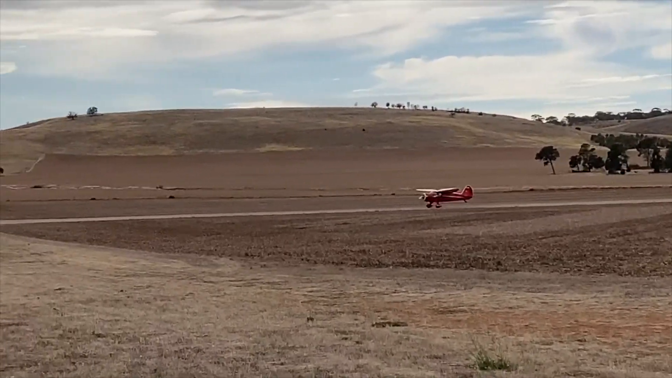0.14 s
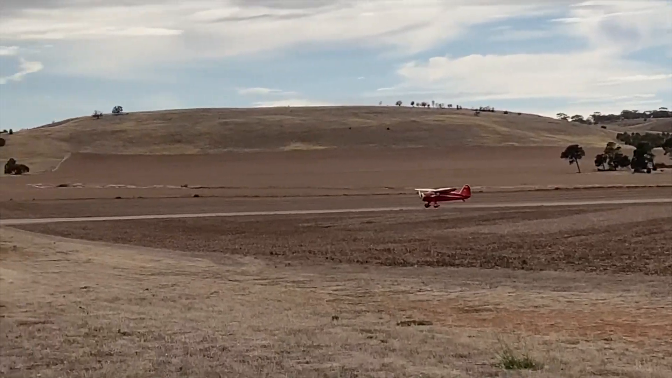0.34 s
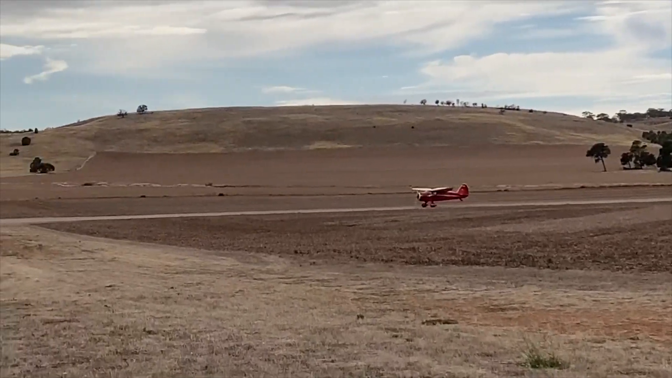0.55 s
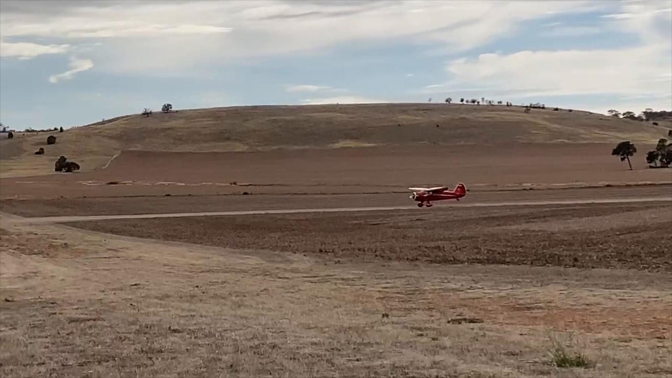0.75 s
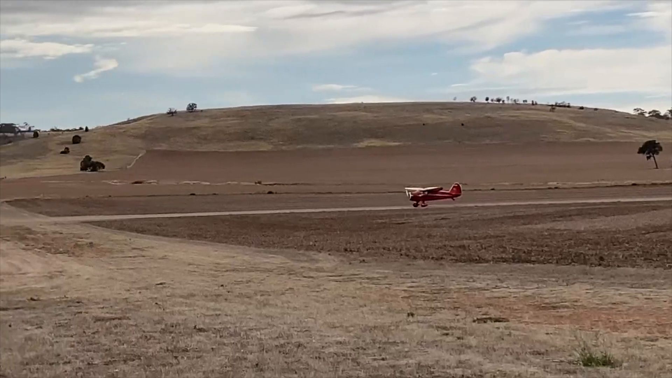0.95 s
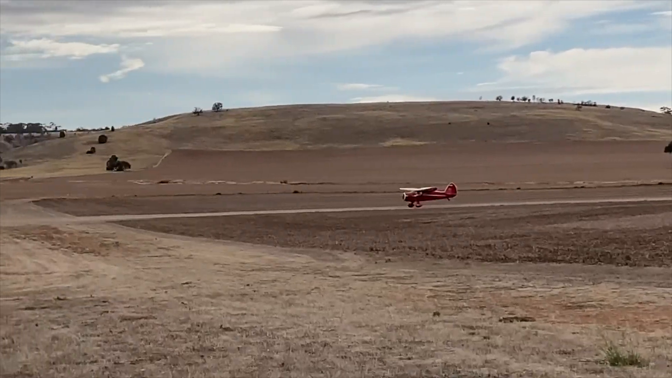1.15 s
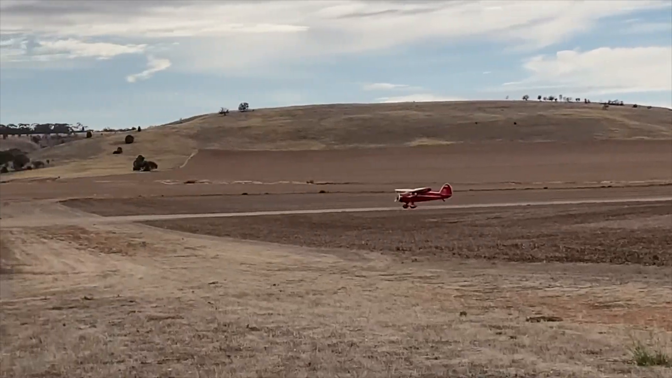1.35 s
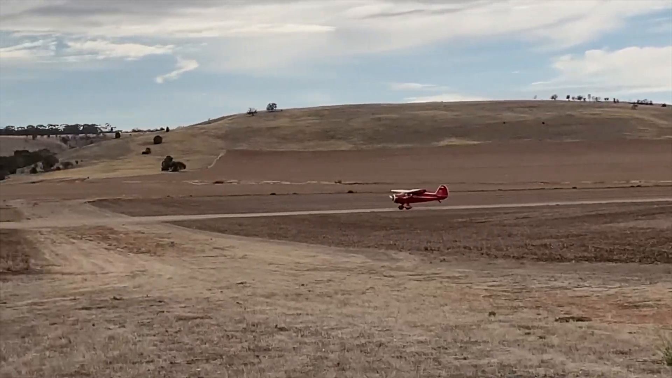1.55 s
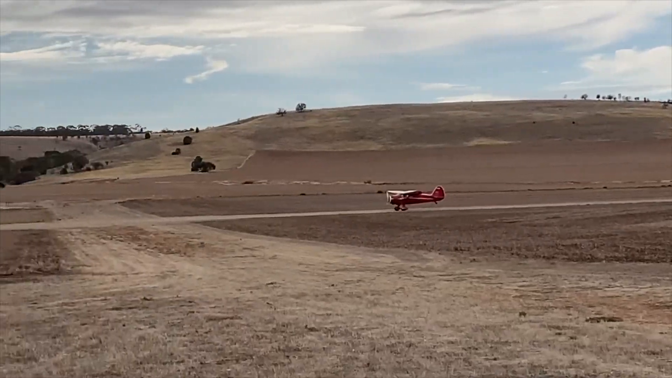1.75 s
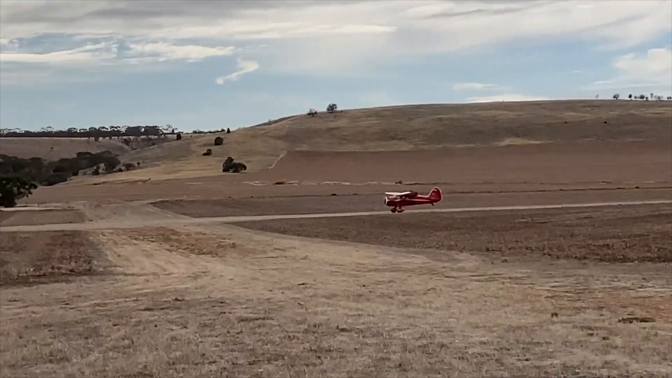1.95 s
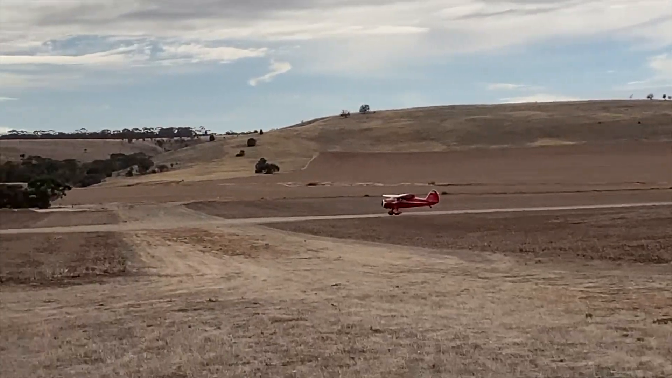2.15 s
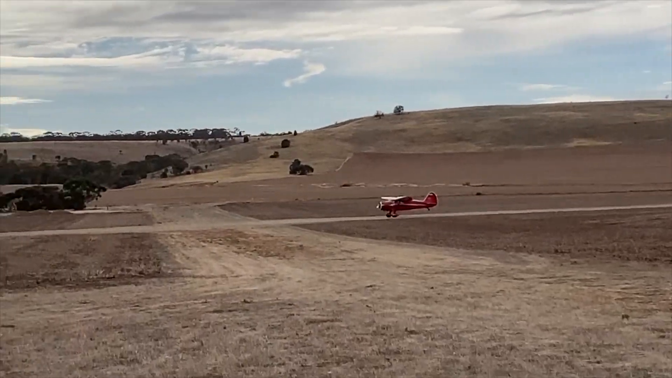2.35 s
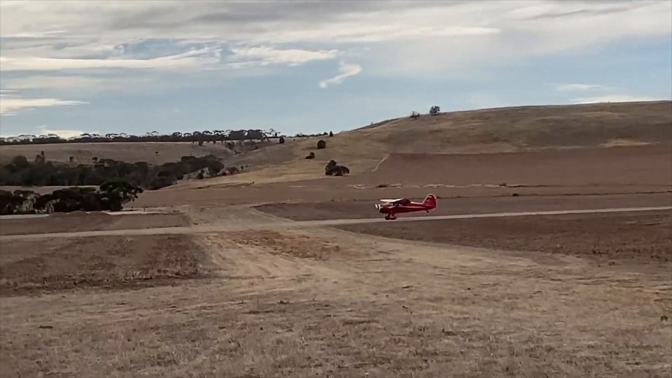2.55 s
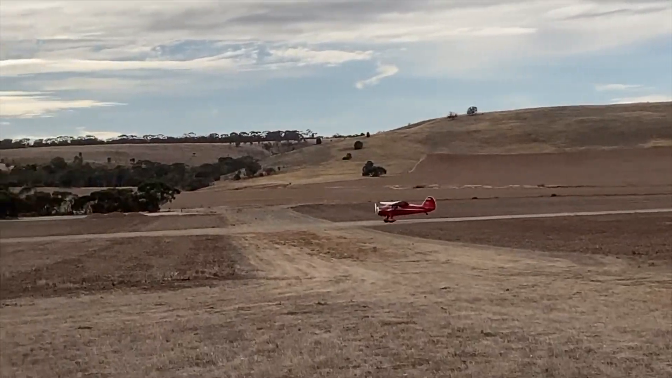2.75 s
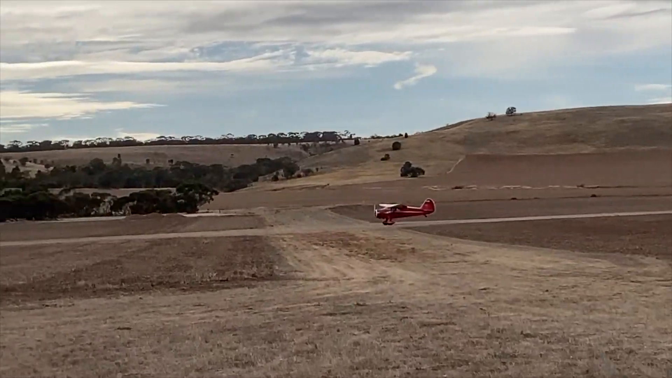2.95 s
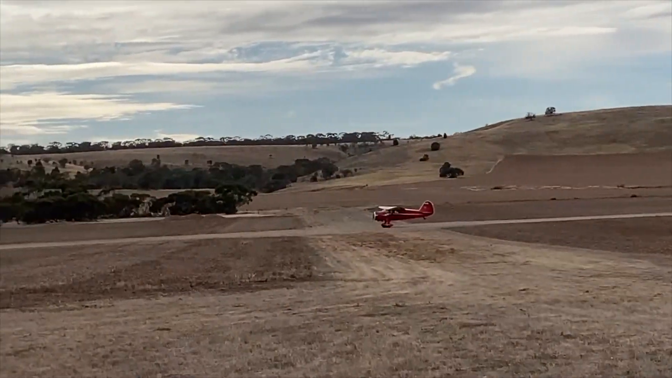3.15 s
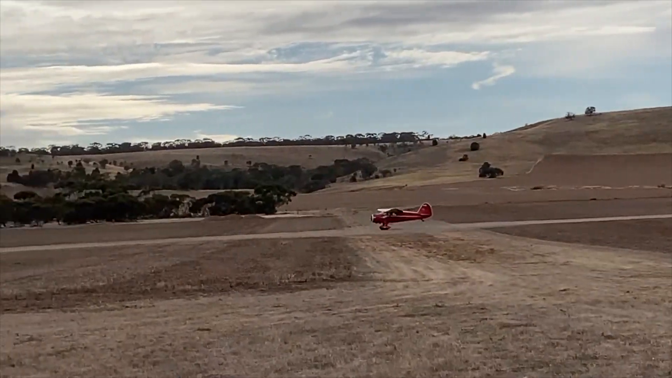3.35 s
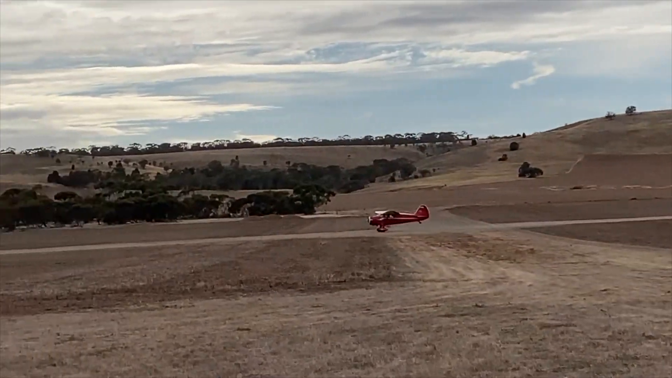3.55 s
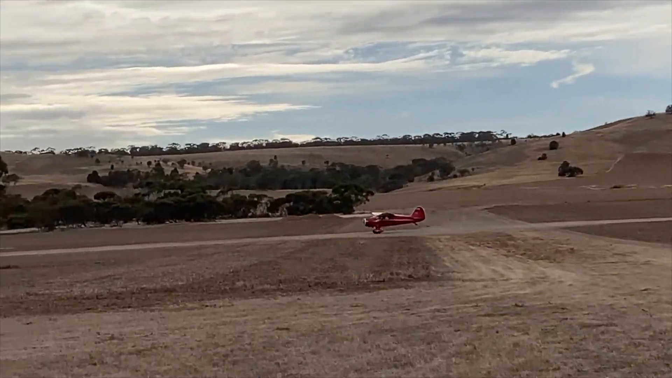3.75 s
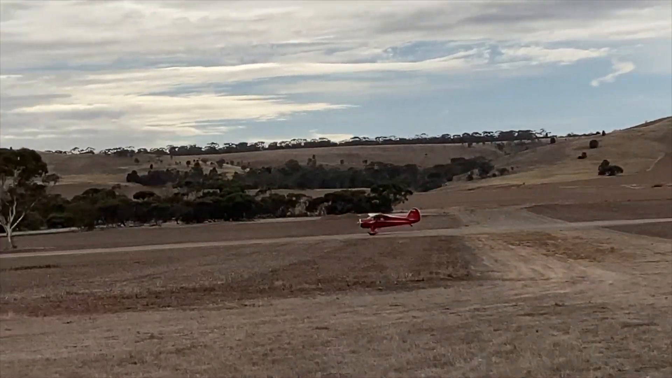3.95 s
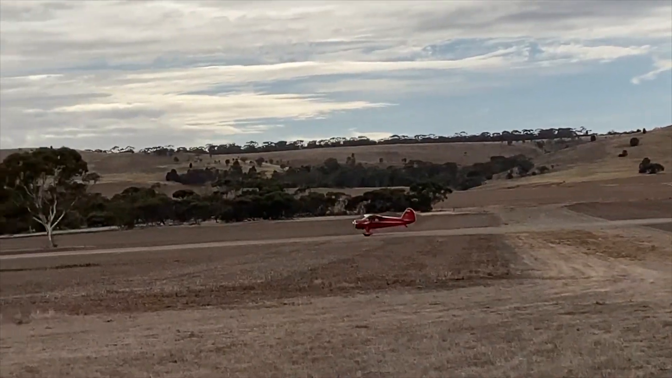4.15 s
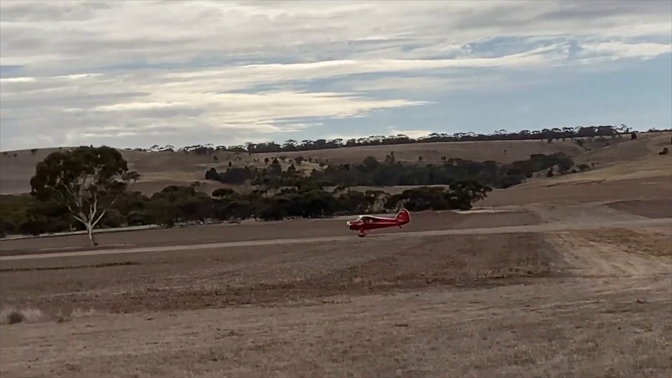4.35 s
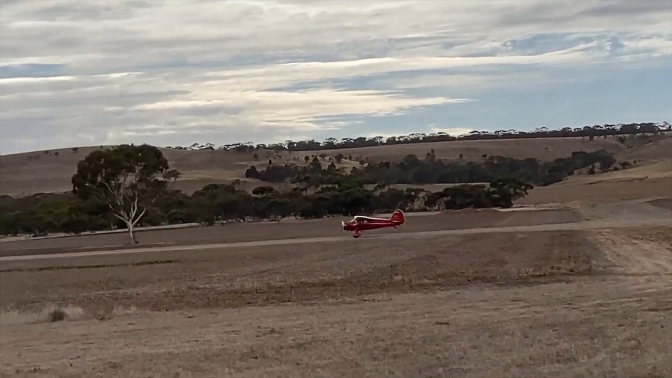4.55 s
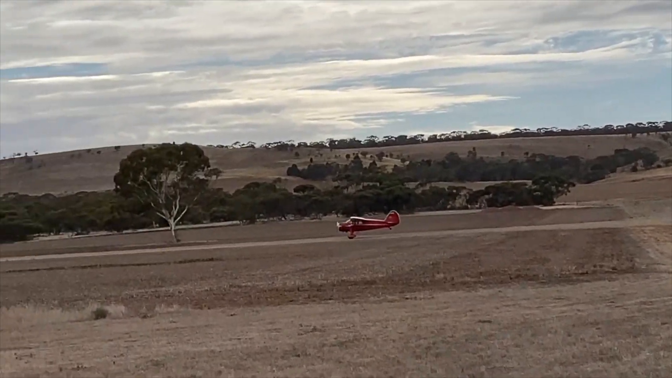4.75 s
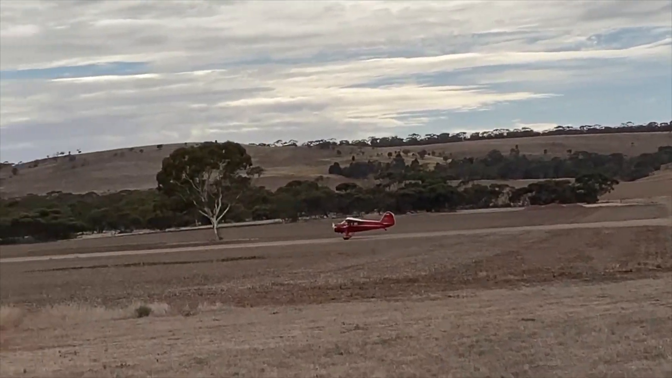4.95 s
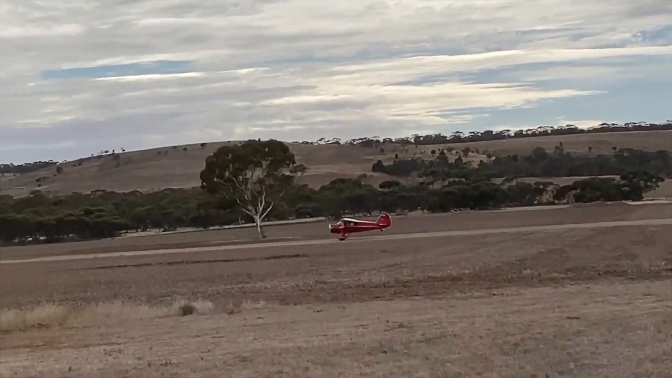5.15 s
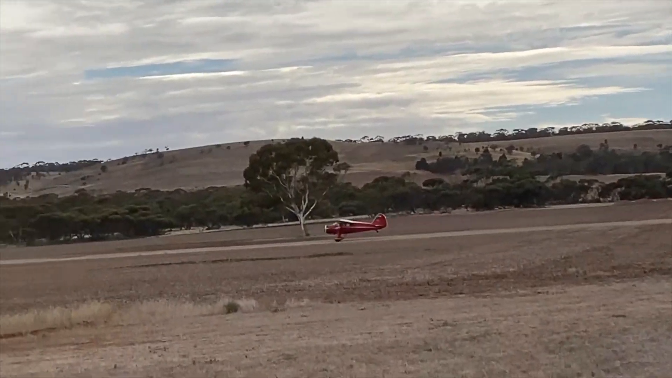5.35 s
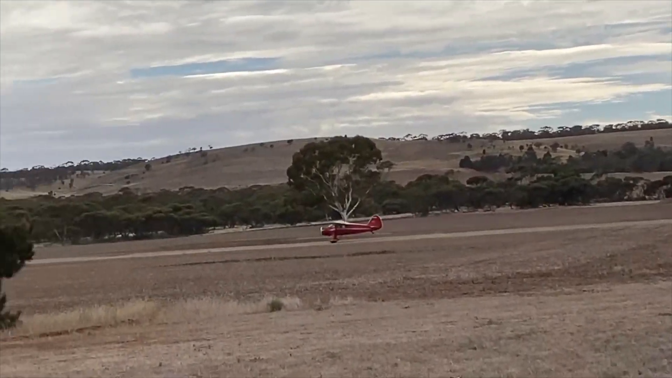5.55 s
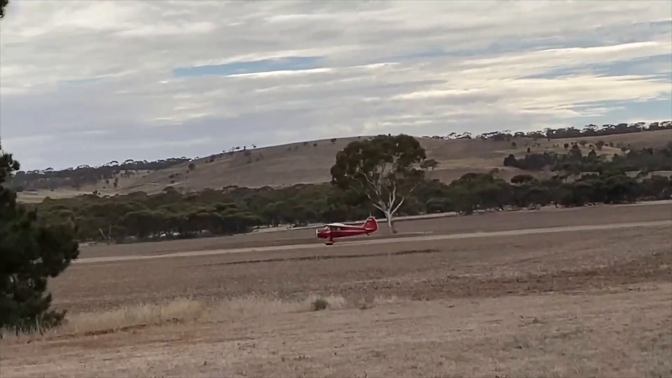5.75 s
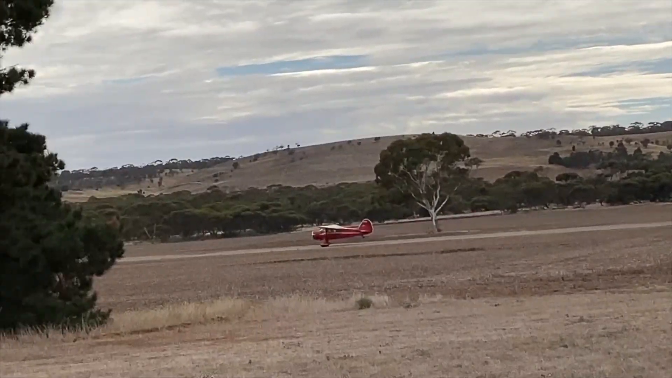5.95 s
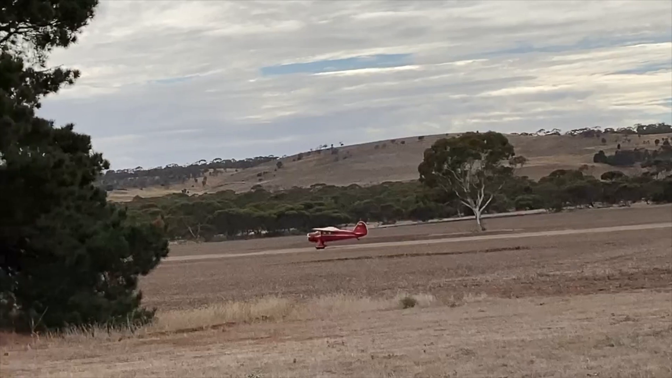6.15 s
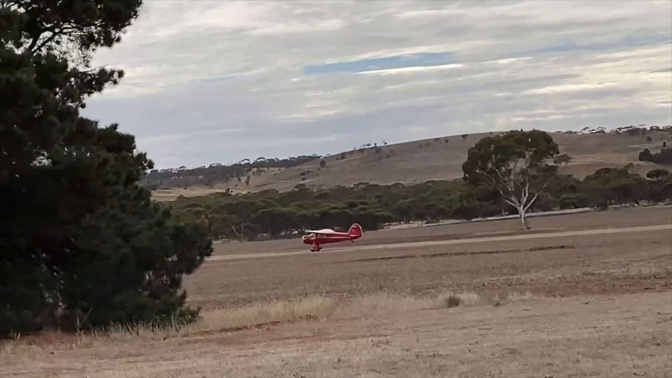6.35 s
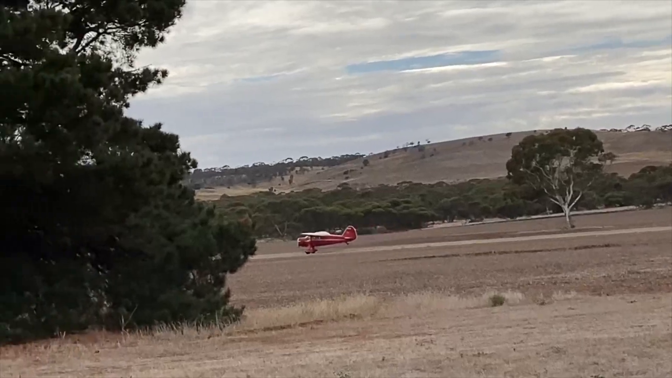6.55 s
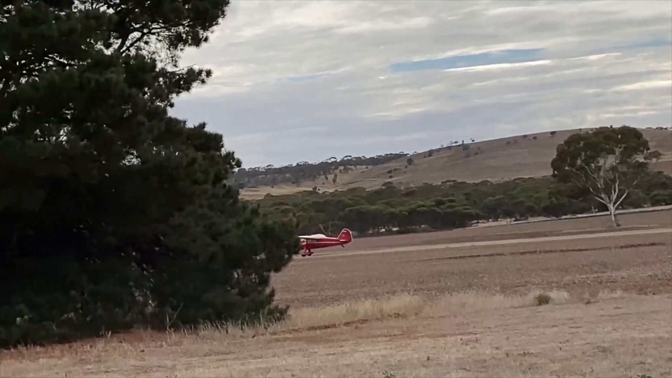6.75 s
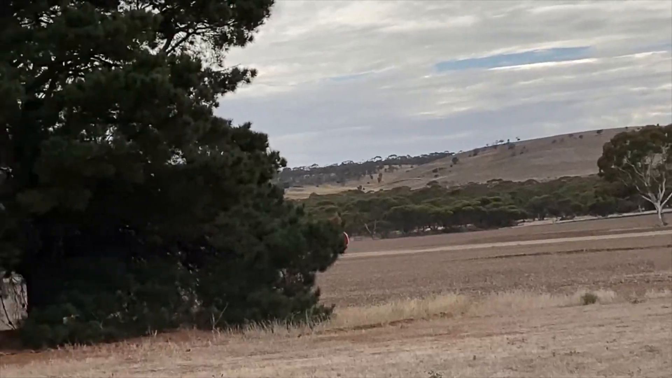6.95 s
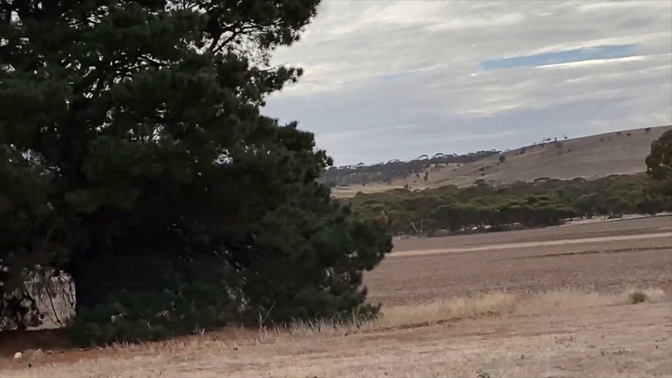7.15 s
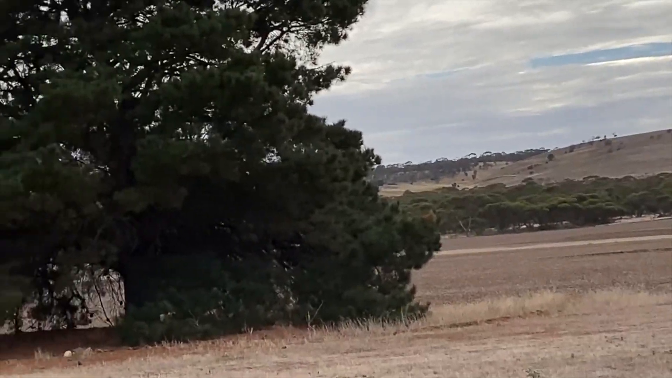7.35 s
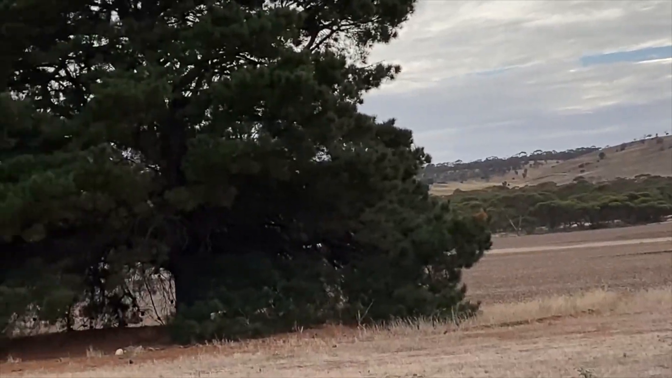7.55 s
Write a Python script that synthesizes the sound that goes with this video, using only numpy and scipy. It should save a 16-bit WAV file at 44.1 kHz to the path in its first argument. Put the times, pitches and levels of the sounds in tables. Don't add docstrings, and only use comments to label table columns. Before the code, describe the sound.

A vintage light aircraft rolls past across open dry fields. Low rumble of slipstream, wheels and a gust of breeze comes first with a soft blade hum; the hum swells and turns buzzy abeam, then uneven exhaust pops and hiss crackle over the drone as the engine slows very slightly. Outdoor handheld stereo microphone at a distance, turning to follow, little echo.

```python
import sys
import numpy as np
from scipy import signal
from scipy.fft import rfft, irfft, next_fast_len
from scipy.io import wavfile

SR = 44100
rng = np.random.default_rng(int(sys.argv[2]) if len(sys.argv) > 2 else 0)


def voltage_ratio(decibels):
    exponent = np.asarray(decibels, float) / 20
    return 10 ** exponent


def unload_audio(sound):
    columns = np.transpose(np.atleast_2d(sound))
    steps = np.round(np.clip(columns, -1, 1) * 32767)
    wavfile.write(sys.argv[1], SR, steps.astype(np.int16))


N = 335593
ABEAM_S, ABEAM_HALF_S = 3.79, 0.72


def in_time(rows):
    s, *columns = np.transpose(rows)
    return [np.interp(np.arange(N) / SR, s, c) for c in columns]


def at_hz(points, hz):
    table_hz, value = np.transpose(points)
    return np.interp(np.log(hz), np.log(table_hz), value)


def at_fft(points, size):
    return at_hz(points, np.maximum(np.arange(size // 2 + 1) * SR / size, 1))


def rms_one(x):
    return x / np.sqrt(np.mean(x ** 2) + 1e-20)


def bell(centre_s, half_s, squareness=2):
    return np.exp(-np.abs((np.arange(N) / SR - centre_s) / half_s) ** squareness)


def drift(rate_hz):
    r = np.exp(-80 * np.pi * rate_hz / SR)
    white = rng.standard_normal(N // 40 + 2002)
    slow = signal.lfilter([1], [1, -2 * r, r * r], white)[2000:]
    return np.interp(np.arange(N) / 40, np.arange(len(slow)), rms_one(slow))


def partial(multiple, cycles, level_db, shimmer_db, wander_rad, offset_rad=0):
    gain = np.sqrt(2) * voltage_ratio(level_db + shimmer_db * drift(5.8))
    return gain * np.cos(2 * np.pi * multiple * cycles + offset_rad + wander_rad * drift(3.8))


# f/Hz, likeness [0-1]
LIKENESS = [(60, .85), (220, .7), (480, .85), (900, .85), (2200, .9), (2900, .65), (4000, .87), (5200, .72),
            (6000, .4), (6800, .9), (9000, .9)]


def bands(low_hz, high_hz, count, spectrum, envelope):
    out, edges = 0, np.geomspace(low_hz, high_hz, count + 1)
    white = rng.standard_normal((2, 2, N))
    for k, (low, high) in enumerate(zip(edges, edges[1:])):
        band = signal.butter(2, [low, high], "band", fs=SR, output="sos")
        mid, side = signal.sosfilt(band, white[k % 2])
        hz = np.sqrt(low * high)
        alike = np.clip(at_hz(LIKENESS, hz), 0, 1)
        pair = np.sqrt(1 + alike) * mid + np.sqrt(1 - alike) * side * [[1], [-1]]
        out = out + envelope(hz) * pair
    size = next_fast_len(N)
    return rms_one(irfft(rfft(out, size) * voltage_ratio(at_fft(spectrum, size)), size)[:, :N])


# f/Hz, density/dB per Hz
RUMBLE_COLOUR = [(20, -25.5), (35, -6), (60, -1), (110, -3.5), (200, -2), (280, -18), (450, -22),
                 (800, -25.5), (1200, -27.5)]


def rumble(null_db, buzz_db):
    breeze_db = 4 * bell(.7, 0.58)
    tips_db = 0.4 * (buzz_db - buzz_db.mean())

    def envelope(hz):
        swell_db = tips_db if hz > 300 else breeze_db if hz > 170 else 0
        return voltage_ratio(2.0 * drift(2.5) + swell_db)
    level_db = -42.5 - .3 * null_db
    return voltage_ratio(level_db) * bands(22, 1088, count=10, spectrum=RUMBLE_COLOUR, envelope=envelope)


# t/s, level/dB
HISS = [
    (0, -59),
    (1.6, -60.5),
    (2.6, -56),
    (5.3, -58.5),
    (6.3, -54.5),
    (7.0, -56),
    (7.5, -59.5),
]
# t/s, half length/s, lift/dB, centre f/Hz
POCKETS = [(.3, 0.27, 2.5, 4500), (1.918, 0.092, -4, 900), (2.389, 0.069, 4, 2000), (2.46, 0.041, 3, 900),
           (2.832, 0.037, 2.5, 1200), (2.99, 0.062, 4, 1900), (3.219, 0.11, 7.5, 1107),
           (3.251, 0.17, 8, 4860), (3.781, .06, 4.5, 1100), (3.99, 0.085, 5.5, 1300),
           (4.736, 0.065, 2.5, 2800), (4.901, 0.046, 5.5, 1800), (5.13, .1, 4.5, 3200),
           (5.463, 0.063, 4.5, 2500), (5.653, .06, 6.5, 1300), (5.582, 0.12, 3.5, 3810),
           (6.504, 0.53, -2.5, 5010), (7.038, .08, 3, 2800), (7.4, .25, -3.5, 5960)]


def hiss_swell(hz):
    follows = 0.63 if hz < 1500 else 0.49 if hz > 2650 else 1
    s, half_s, lift_db, centre_hz = np.transpose(POCKETS)
    t = np.arange(0, N + 128, 128) / SR
    level_db = np.interp(t, *np.transpose(HISS))
    near_db = lift_db * np.exp(-(np.log2(hz / centre_hz) / 0.81) ** 2)
    pockets_db = np.exp(-((t[:, None] - s) / half_s) ** 2) @ near_db
    return np.interp(np.arange(N) / SR, t, follows * (level_db - level_db.mean()) + pockets_db)


# place in cycle [0-1], bark level/dB, sizzle level/dB
CYLINDERS = [
    (0.058, 2.4, 4),
    (.28, -3.5, 1),
    (.53, -14, -5),
    (.64, -1, -0.5),
    (0.789, -6.5, -4.5),
]
# f/Hz, density/dB per Hz
HISS_COLOUR = [(600, -5), (900, -9), (1200, -1.5), (1470, -6), (1620, -1), (2200, 0.5), (2570, -9),
               (2750, -7.5), (3050, -12.5), (3400, -10.5), (4500, -12), (6000, -19.5), (7000, -19.5),
               (9000, -31), (10500, -45.5)]


def exhaust_hiss(cycles):
    place, bark_db, sizzle_db = np.transpose(CYLINDERS)
    count = int(cycles[-1]) + 2
    firings = (np.arange(-1, count)[:, None] + np.sort(place)).ravel()
    last = np.searchsorted(firings, cycles) - 1
    since = cycles - firings[last]
    spit = (1 - np.exp(-since / .034)) * np.exp(-since / .11)
    common = rng.standard_normal(len(firings))

    def envelope(hz):
        high = hz > 2650
        cylinder_db = np.tile(sizzle_db if high else bark_db, count + 1)
        own = np.clip(rng.standard_normal(len(firings)), -3, 1.7)
        force = voltage_ratio(cylinder_db + 1.1 * common + (2.3 if high else 3.6) * own)
        return voltage_ratio(hiss_swell(hz) + 2.05 * drift(8)) * (0.32 + force[last] * spit)
    return voltage_ratio(-53) * bands(646, 10860, count=16, spectrum=HISS_COLOUR, envelope=envelope)


# t/s, peak level/dB, pipe ring f/Hz
POPS = [(2.9843, -37.5, 1870), (3.1433, -45.5, 2070), (3.7813, -38, 2175), (4.0495, -38.5, 1664),
        (4.2602, -33.5, 2160), (4.742, -37, 2290), (4.9023, -34, 2150), (5.116, -41, 1850),
        (5.1683, -41, 1650), (5.224, -39.5, 1900), (5.3827, -42, 1910), (5.436, -31.5, 2120),
        (5.489, -37.5, 1825), (5.627, -35.5, 1670), (5.6521, -40.5, 1576), (5.7044, -40, 1375),
        (5.7355, -39, 1810), (5.9733, -36, 2085), (6.2432, -36.5, 1997), (6.6202, -35, 1820),
        (6.6764, -37.5, 2044), (6.7286, -39, 1930), (6.8376, -42, 1700), (6.923, -38.5, 2290),
        (7.0556, -36.5, 1784), (7.1077, -36, 2030), (7.1648, -41, 1250), (7.3262, -38.5, 2310),
        (7.5433, -47, 1260), (7.5752, -35, 1790)]


def pops():
    out, t = np.zeros(N), np.arange(round(.025 * SR)) / SR
    for s, peak_db, ring_hz in POPS:
        jitter_rad = np.cumsum(rng.normal(0, 0.065, len(t)))
        ring = np.sin(2 * np.pi * ring_hz * t + jitter_rad) * np.exp(-t / 0.0044)
        crack = rng.standard_normal(len(t)) * np.exp(-t / .002) * voltage_ratio(-26.0)
        pop = (ring + crack) * (1 - np.exp(-t / 0.002)) ** 2 * voltage_ratio(peak_db + 4.5)
        at = round((s - .002) * SR)
        out[at:at + len(t)] += pop[:N - at]
    return signal.sosfilt(signal.butter(4, [900, 6500], "band", fs=SR, output="sos"), out)


# t/s, level/dB
EXHAUST = [(0, -34.5), (.9, -35.5), (1.5, -30.5), (2.2, -28.5), (2.85, -33.5), (3.4, -26.5), (3.92, -34),
           (4.2, -29.5), (5.2, -31.5), (6.9, -33), (7.2, -31), (7.61, -36)]
# multiple of engine cycle, level/dB
UNEVEN = [(2, -19.5), (3, -5), (6, -3.5), (7, -2), (9, -7.5), (10, -10.5), (11, -10.5), (13, -20.5)]


def exhaust_tones(cycles, blade_db):
    fired = cycles - .035
    firing_db = in_time(EXHAUST)[0]
    abeam_db = 4.5 * bell(ABEAM_S, ABEAM_HALF_S)
    uneven_db = -9.5 - 3 - np.arange(N) / SR + abeam_db + 0.89 * blade_db
    tones = partial(5, fired, firing_db, 0.58, 0.12)
    for multiple, level_db in UNEVEN:
        follows_db = firing_db - 11.0 if multiple < 6.5 else uneven_db
        tones += partial(multiple, fired, follows_db + level_db, 0.58, 0.54)
    return tones


# multiple of engine cycle, level under buzz/dB
BLADE_MISMATCH = [(14, -14), (15, -26.5), (18, -24), (22, -25.5), (26, -25.5), (30, -29.5)]


def mismatch(cycles, buzz_db):
    behind_s = np.maximum(np.arange(N) / SR - ABEAM_S - ABEAM_HALF_S, 0)
    level_db = buzz_db - 4 * behind_s
    return sum(partial(multiple, cycles, level_db + under_db, 1.5, 0.54) for multiple, under_db in BLADE_MISMATCH)


# t/s, blade rate f/Hz
SPEED = [(0.0, 74.77), (0.8, 75.0), (1.2, 75.18), (1.6, 75.3), (2.4, 75.46), (2.8, 75.26), (3.2, 75.35),
         (3.6, 75.29), (4.0, 74.92), (4.4, 75.07), (4.8, 74.83), (5.2, 74.72), (6.0, 74.37), (7.61, 73.32)]


def engine_cycles():
    return np.cumsum(in_time(SPEED)[0] / 4) / SR


# t/s, level/dB, tip sharpness/dB
PROPELLER = [(0, -41, -17), (.6, -36, -18), (1.0, -38.5, -13.5), (1.6, -34.5, -14.5), (1.95, -30, -24),
             (2.15, -31, -17), (2.4, -34, -16), (2.55, -33, -10), (2.8, -28.5, -15.5), (3.4, -28, -13.5),
             (3.65, -27, -8), (4.15, -26, -9), (4.35, -26.5, -16.5), (5.1, -26.5, -18.5),
             (5.7, -27.5, -14.5), (6.0, -28, -17), (7.1, -27, -16), (7.61, -29, -17)]


def blade_levels():
    return in_time(PROPELLER)


# t/s, lead/engine cycles
VIEW_LEAD = [
    (0, -.06),
    (1.6, -.07),
    (3.6, -.125),
    (7.61, -.125),
]
# blade harmonic, level off even thinning/dB
BUZZ_RIPPLE = [(4, 0.33), (5, 1), (6, 1), (7, 2), (8, -0.5), (9, -1), (10, -3.5), (11, -5), (12, -5.5),
               (13, -8.5)]


def propeller(cycles, blade_db, tip_db, buzz_db, null_db):
    t = np.arange(N) / SR
    cycles = cycles + in_time(VIEW_LEAD)[0]
    skew, ground_turn = -1.5, 1.5
    first_db = -33.5 + 1.2962 * t - null_db
    passed = (1 + np.tanh((t - ABEAM_S) / ABEAM_HALF_S + 2)) / 2
    third_db = blade_db - 11 + 0.21 * (tip_db - tip_db.mean())
    third_db = third_db + 6 * bell(ABEAM_S, ABEAM_HALF_S) + 3.5 * passed
    thinning_db = 2.5 + 0.1568 * t - 1.5 * bell(5.13, .6)
    hum = partial(4, cycles, first_db, 0.28, .02, skew - ground_turn / 2)
    hum += partial(8, cycles, blade_db, 0.52, 0.039, skew + ground_turn)
    hum += partial(12, cycles, third_db, 0.98, 0.071, skew)
    for k, ripple_db in BUZZ_RIPPLE:
        level_db = buzz_db - 4.5 - thinning_db * (k - 4) + ripple_db
        hum += partial(4 * k, cycles, level_db, 0.29 * k, 0.026 * k, skew)
    return hum


# t/s, left over right level/dB
SWING = [
    (0, 1.2),
    (2, .8),
    (3.5, 0),
    (7.61, -.2),
]


def swing(tones):
    tilt = voltage_ratio(in_time(SWING)[0] / 2)
    return tones * [tilt, 1 / tilt]


# f/Hz, left over right level/dB
LEFT_OVER_RIGHT = [(56, -1.5), (75, -2.3), (170, -2.3), (225, -.3), (450, .9), (525, -2), (750, 1.5),
                   (1050, .5), (1350, 4.5), (1550, 2), (1800, 7), (2100, 2.5), (3300, .6), (5000, -1.5),
                   (6200, .8)]
# f/Hz, left lead/rad
LEFT_LEAD = [(50, .03), (450, .03), (600, .24), (900, .05), (1200, .24), (1470, -.55), (1600, -.15),
             (2000, -1.15), (2300, -.55), (3300, -.4), (5200, -.72), (7000, -.38), (9200, -3.2),
             (10500, -5.9)]


def ports(pair):
    size = next_fast_len(N + 4096)
    half = voltage_ratio(at_fft(LEFT_OVER_RIGHT, size) / 2) * np.exp(.5j * at_fft(LEFT_LEAD, size))
    return irfft(rfft(pair, size) * [half, 1 / half], size)[:, :N]


def scene():
    cycles = engine_cycles()
    blade_db, tip_db = blade_levels()
    buzz_db = blade_db + tip_db + 0.17
    null_db = 13.5 * bell(2.92, 1.11, squareness=4.6)
    noise = rumble(null_db, buzz_db) + exhaust_hiss(cycles)
    tones = exhaust_tones(cycles, blade_db) + mismatch(cycles, buzz_db)
    tones = tones + propeller(cycles, blade_db, tip_db, buzz_db, null_db)
    return ports(noise + pops() + swing(tones))


def wind_filter(pair):
    hz, s, spectra = signal.stft(pair, SR, nperseg=4096, noverlap=3072)
    on_s = np.maximum(1.95 - .019 * hz, -.5)
    off_s = np.minimum(3.3 - .008 * hz, 2.6)
    rise = np.tanh((s - on_s[:, None]) / 0.71)
    fall = np.tanh((off_s[:, None] - s) / .12)
    share = (1 + rise) * (1 + fall) / 4 * (hz < 245)[:, None]
    lag_s = .0019
    turn = np.exp(1j * np.pi * hz[:, None] * lag_s * share)
    return signal.istft(spectra * [turn, 1 / turn], SR, nperseg=4096, noverlap=3072)[1][:, :N]


# level/dB, rows left and right
CLOCK_LEAK_DB = [
    [-69.5],
    [-71],
]


def clock_leak(pair):
    clock_hz = 11014.5
    clock = 2 * voltage_ratio(np.array(CLOCK_LEAK_DB)) * np.cos(2 * np.pi * clock_hz * np.arange(N) / SR)
    return pair * (1 + clock)


def top_cut(x):
    return signal.sosfilt(signal.butter(12, 11800, fs=SR, output="sos"), x)


def record(dry):
    mix = clock_leak(wind_filter(dry))
    return top_cut(mix)


dry = scene()
out = record(dry)
unload_audio(out)
```